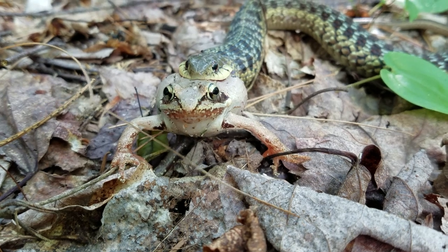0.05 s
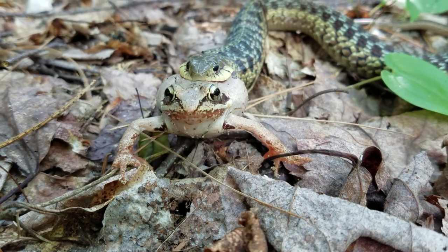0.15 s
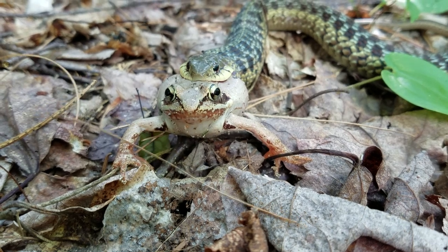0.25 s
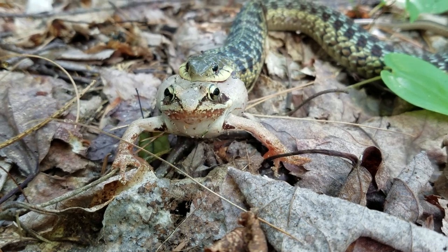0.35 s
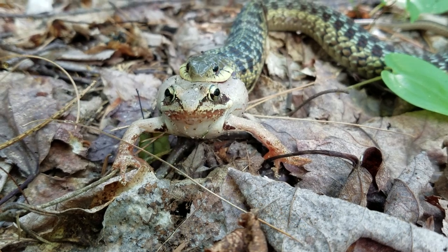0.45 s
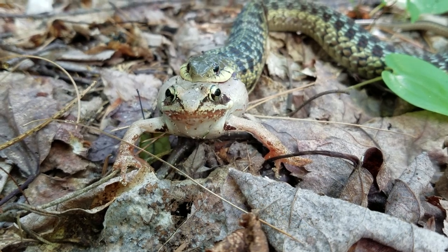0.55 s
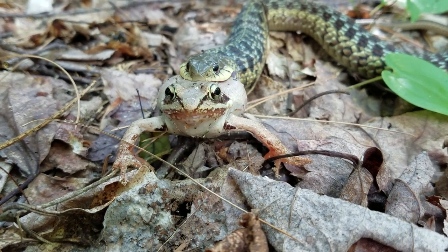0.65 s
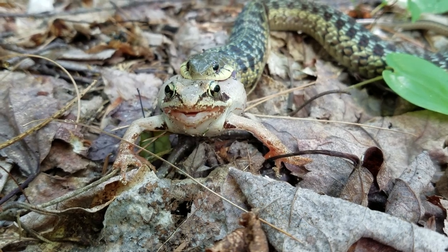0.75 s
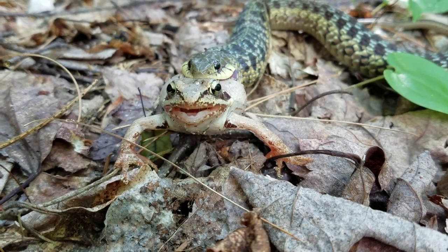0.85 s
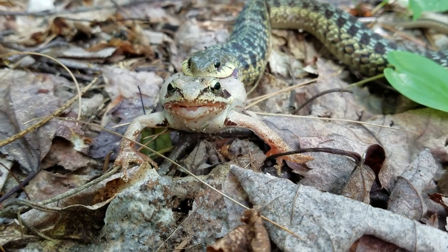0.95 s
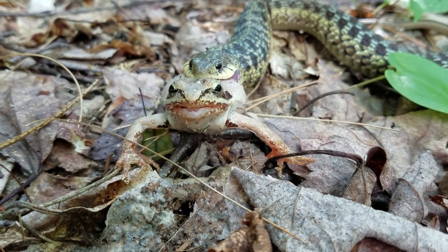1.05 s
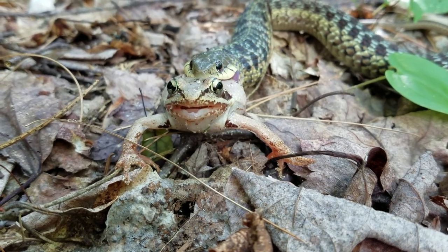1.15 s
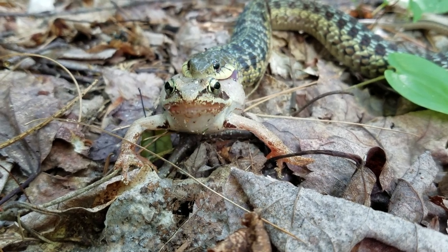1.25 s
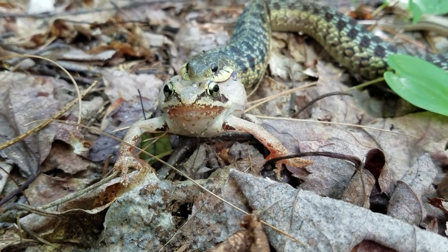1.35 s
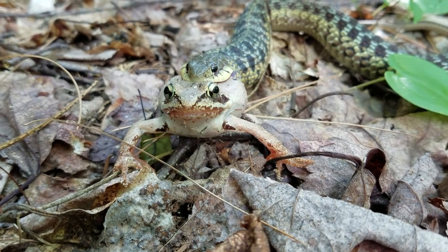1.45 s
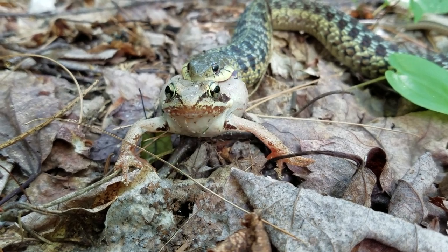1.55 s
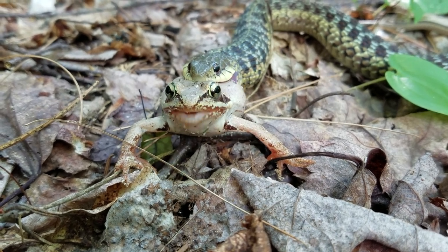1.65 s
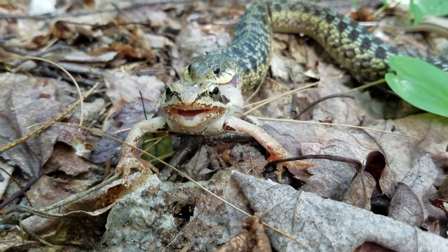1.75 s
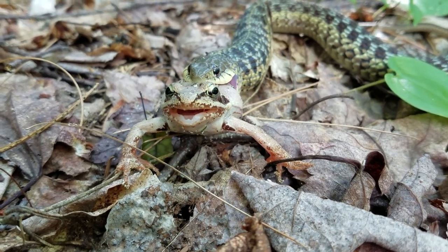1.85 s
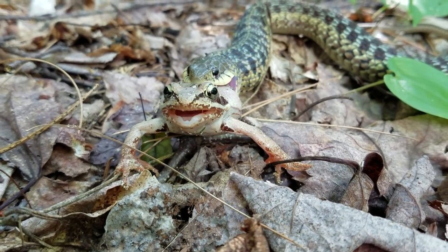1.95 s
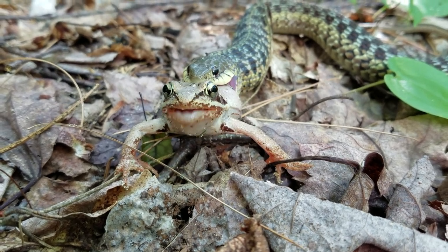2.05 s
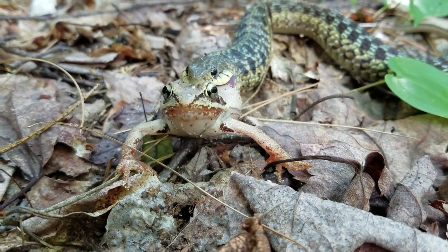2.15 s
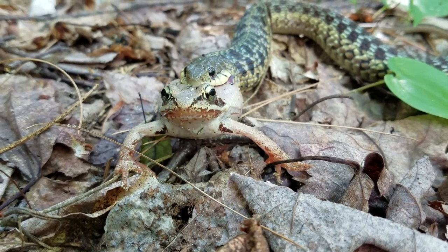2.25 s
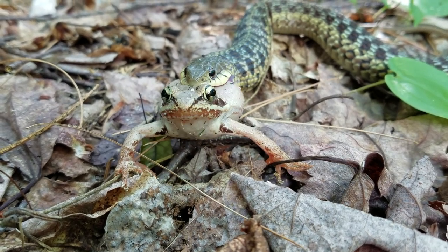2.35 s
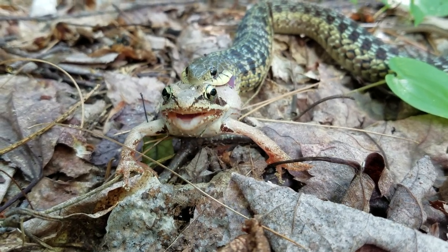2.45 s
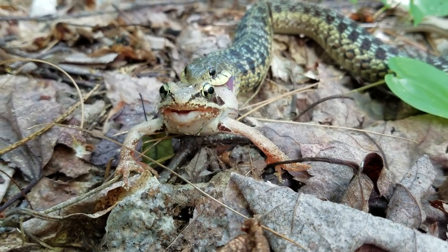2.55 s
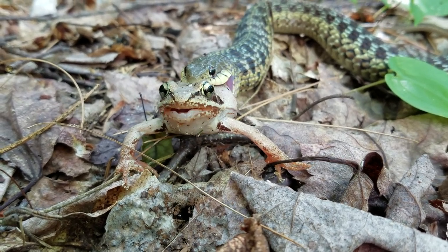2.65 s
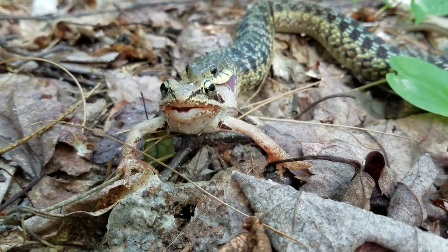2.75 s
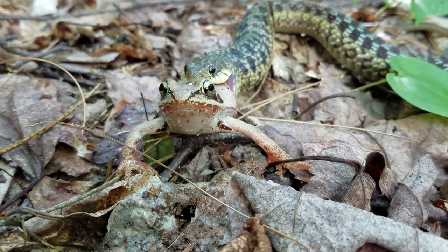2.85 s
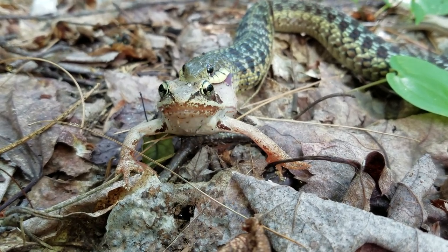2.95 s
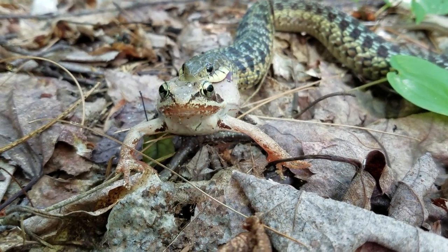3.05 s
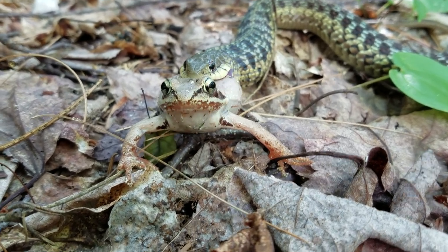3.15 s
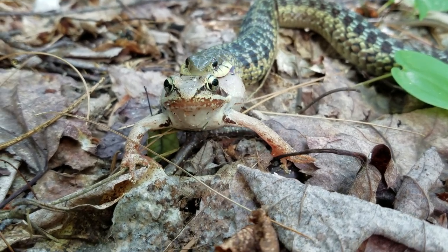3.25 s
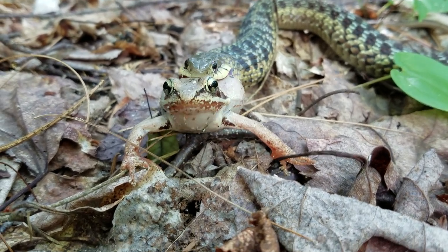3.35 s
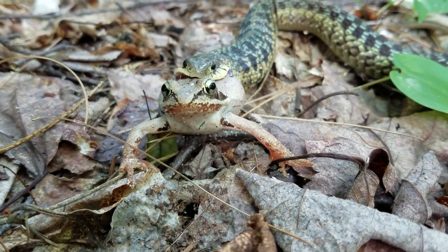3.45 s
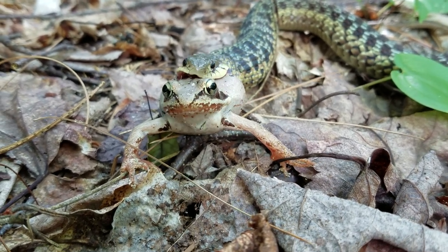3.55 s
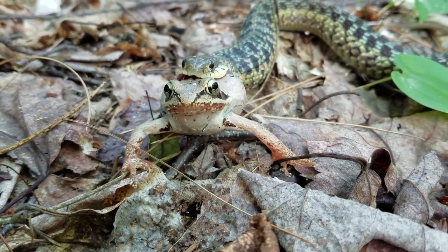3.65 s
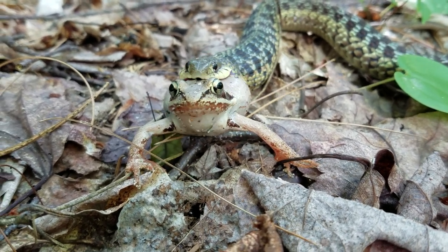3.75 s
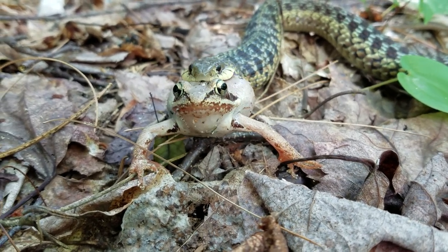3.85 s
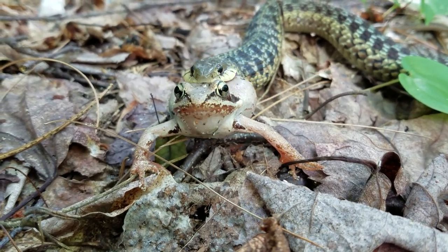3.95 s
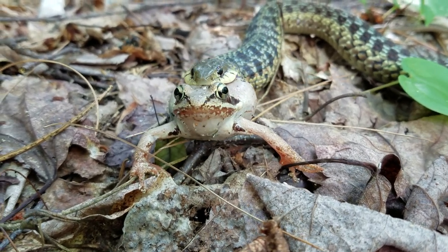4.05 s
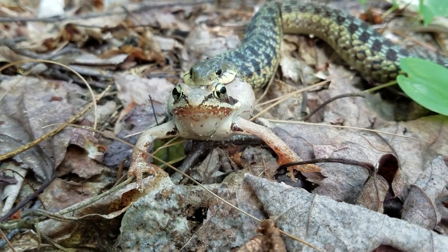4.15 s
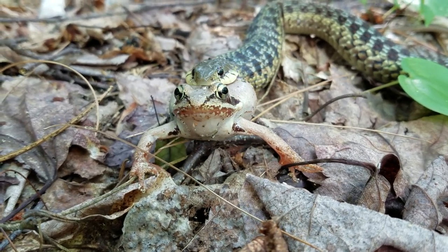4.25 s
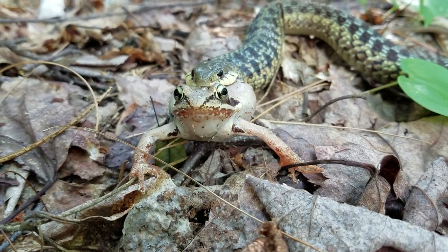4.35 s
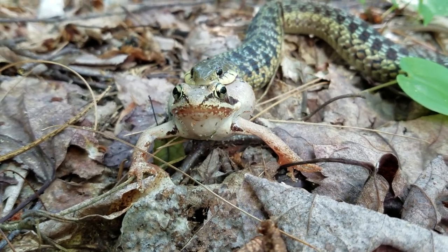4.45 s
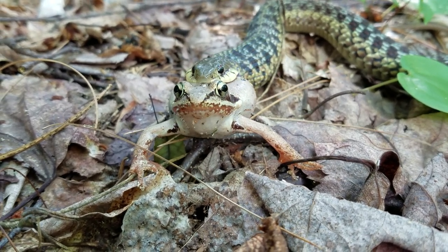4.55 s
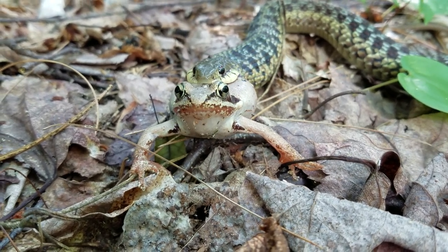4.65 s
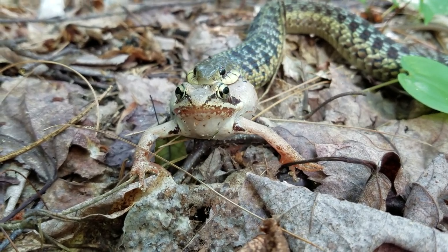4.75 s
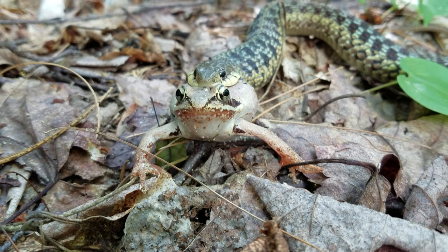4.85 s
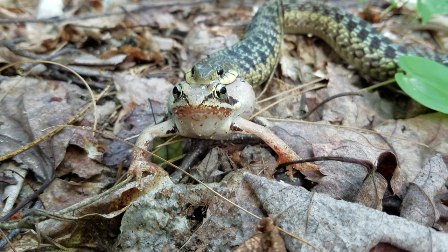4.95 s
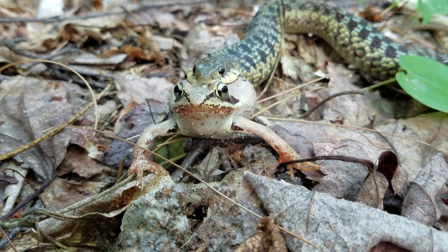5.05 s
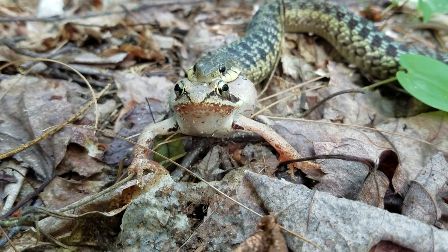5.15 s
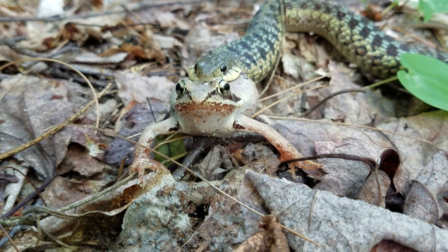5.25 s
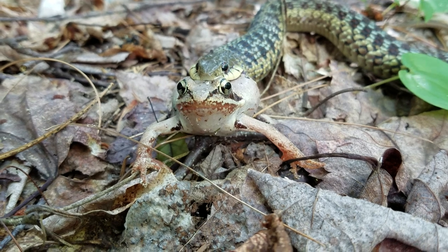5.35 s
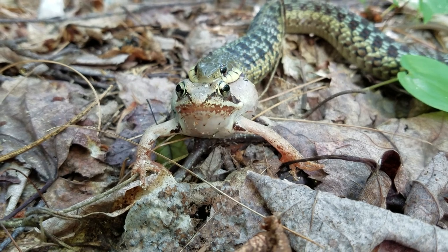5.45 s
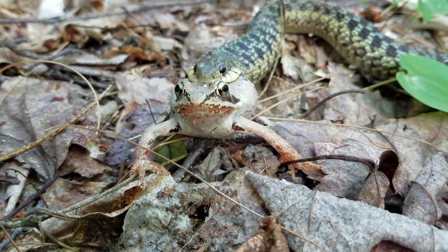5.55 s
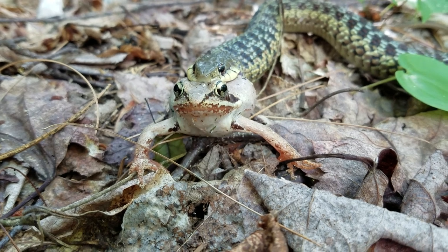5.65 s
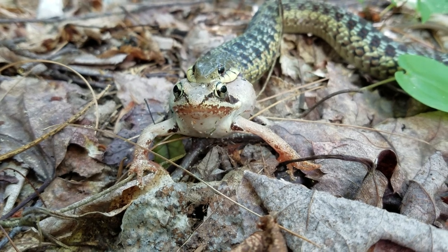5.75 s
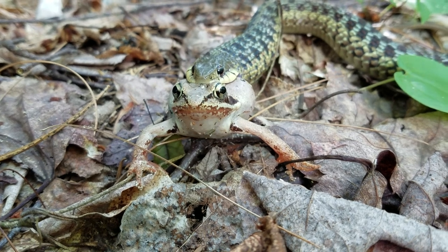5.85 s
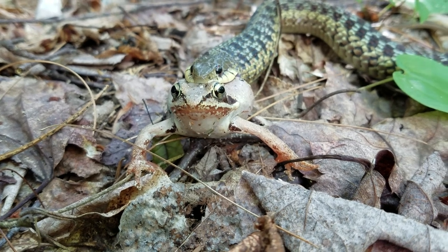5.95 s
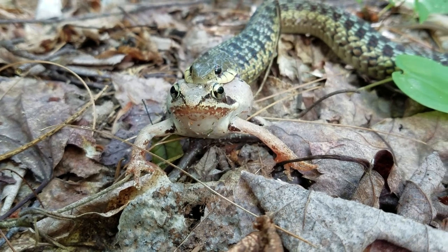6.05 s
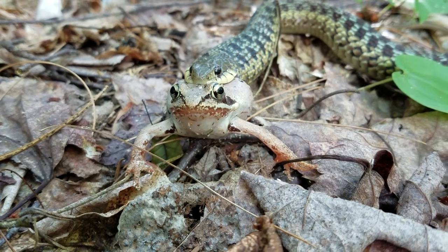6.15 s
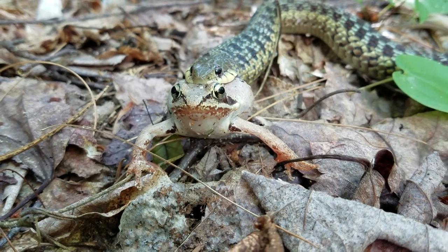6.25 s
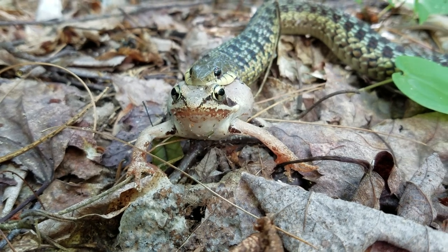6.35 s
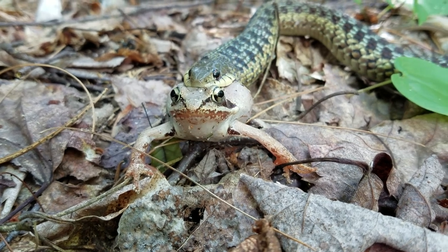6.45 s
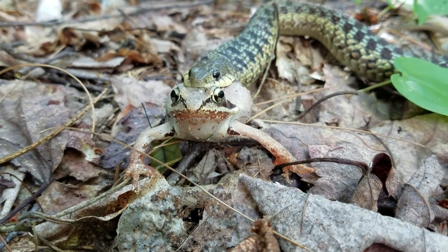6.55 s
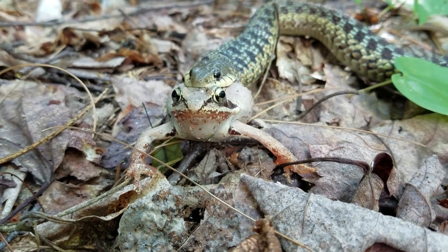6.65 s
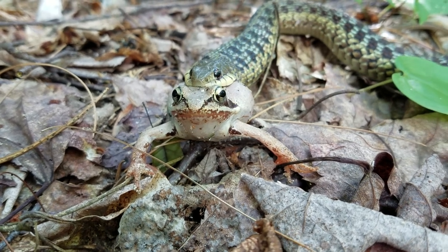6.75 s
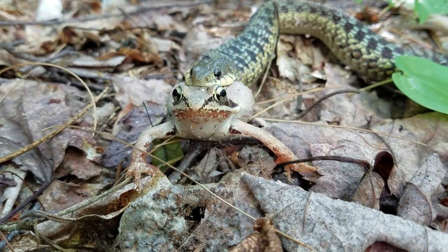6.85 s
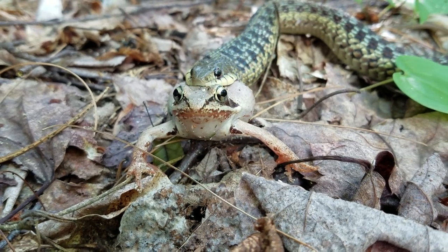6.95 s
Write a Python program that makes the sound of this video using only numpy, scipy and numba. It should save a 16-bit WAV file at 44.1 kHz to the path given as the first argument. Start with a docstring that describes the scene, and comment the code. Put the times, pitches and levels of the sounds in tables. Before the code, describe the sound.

Quiet forest air opens with faint dry leaf ticks and a very low, distant motor drone. At about 0.8 s a tiny double snap launches a frog's piercing scream, climbing fast from about 1.3 to 2.4 kHz, holding, then dropping hoarsely by 1.3 s into a few soft creaks. A second, slightly lower scream runs 1.7 to 2.1 s, again ending in creaks. The third, 2.5 to 2.8 s, is shorter, rougher and lower, rising, sagging and climbing again, then breaking into four slowing snaps and fading creaks. A bright leaf crack comes near 3 s; a faint scaly hiss swells around 3.7 s. From there only sparse crisp leaf cracks remain, strongest near 4.5 and 5 s, with barely felt camera bumps. A small bright chip sounds on the left near 6.9 s. Close, dry stereo, brighter on the right, with slight woodland scatter.

```python
"""Frog screaming in a snake's jaws

A forest floor, close to a hand-held camera's two microphones: a held frog screams three times.
Its vocal cords buzz through a moving mouth resonance; sharp snaps and soft creaks stand around the cries.
Dry leaves crack as filtered noise bursts under the snake, and scales hiss as fluttering noise.
The camera is bumped, one bright chip sounds on the left, and a far motor drones in soft forest air."""
import sys
import numpy as np
from scipy import signal
from scipy.fft import rfft, irfft
from scipy.io import wavfile
from numba import njit

SR = 44100
rng = np.random.default_rng(int(sys.argv[2]) if len(sys.argv) > 2 else 0)


def store_pcm(level_fs):
    """Save levels as 16-bit WAV."""
    pcm = np.round(np.clip(level_fs, -1, 1) * 32767).astype(np.int16)
    wavfile.write(sys.argv[1], SR, np.atleast_2d(pcm).T)


N = 308700
TIME = np.arange(N) / SR


def undb(db):
    """Decibels to gain."""
    return 10 ** (np.asarray(db) / 20)


def unit(x):
    """Scale to rms 1."""
    return x / np.sqrt(np.mean(x ** 2))


def curve(table, axis=1):
    """One column of a time table at every sample."""
    rows = np.array(table)
    return np.interp(TIME, rows[:, 0], rows[:, axis])


def on_log(table, hz):
    """Read (frequency [Hz], value) points on a log-frequency axis."""
    points, values = np.transpose(table)
    return np.interp(np.log(hz + 1), np.log(points), values)


def colour(x, table, size=1024):
    """Minimum-phase filter with the gain of (frequency [Hz], gain [dB]) points."""
    gain = undb(on_log(table, np.fft.rfftfreq(size, 1 / SR)))
    # folding the cepstrum forward in time makes the filter causal
    cepstrum = irfft(np.log(gain))
    cepstrum[1:size // 2] *= 2
    cepstrum[size // 2 + 1:] = 0
    response = irfft(np.exp(rfft(cepstrum)))
    return signal.fftconvolve(x, response)[:len(x)]


@njit
def svf(x, hz, width):
    """State-variable band-pass with a moving centre, gain 1 at the peak."""
    y, b, l = np.empty(len(x)), 0., 0.
    for i in range(len(x)):
        g, k = np.tan(np.pi * hz[i] / SR), width / hz[i]
        v = (b + g * (x[i] + 1e-18 - l)) / (1 + g * (g + k))
        b, l, y[i] = 2 * v - b, l + 2 * g * v, k * v
    return y


def resonate(x, hz, width_hz):
    """One resonance, fixed or moving."""
    return svf(x, hz * np.ones(len(x)), float(width_hz))


def walk(rate_hz):
    """Random wander with spread 1, straight lines between random knots."""
    knots = rng.standard_normal(int(N / SR * rate_hz) + 2)
    return unit(np.interp(TIME * rate_hz, np.arange(len(knots)), knots))


def add(track, s, sound, peak_db):
    """Put a short sound into a track at time s, scaled to a peak level."""
    start = int(s * SR)
    scaled = sound * undb(peak_db) / np.abs(sound).max()
    track[start:start + len(sound)] += scaled[:N - start]


def impulse(size=1024):
    """A single sharp push."""
    return signal.unit_impulse(size)


def frog():
    """The held frog: three screams, snaps of slack cords and creaks, all from one throat."""
    # pitch of each cry: (time [s], pitch [Hz])
    # the first two rise, hold and fall; the third rises, sags and climbs again
    pitch_1, pitch_2, pitch_3 = [(0.855, 1316), (0.865, 1405), (0.881, 1690), (0.907, 1907), (0.915, 1943),
                                 (0.925, 2123), (0.945, 2174), (1.049, 2280), (1.055, 2326), (1.113, 2399),
                                 (1.145, 2358), (1.157, 2391), (1.207, 2210), (1.223, 2072), (1.269, 1460),
                                 (1.292, 1369)], [(1.732, 1282), (1.754, 1509), (1.762, 1690),
                                                  (1.772, 1793), (1.784, 1806), (1.808, 2042),
                                                  (1.842, 1992), (1.884, 2013), (1.902, 2071),
                                                  (1.992, 2070), (2.03, 1986), (2.062, 1736), (2.09, 1441),
                                                  (2.111, 1430)], [(2.529, 1320), (2.545, 1490),
                                                                   (2.563, 1559), (2.605, 1570),
                                                                   (2.637, 1528), (2.657, 1477),
                                                                   (2.677, 1382), (2.701, 1316),
                                                                   (2.715, 1312), (2.747, 1476),
                                                                   (2.765, 1536)]
    # mouth during each cry: (time [s], relative effort [dB], mouth resonance [Hz])
    mouth_1, mouth_2, mouth_3 = [(.857, -.5, 4970), (0.904, -9, 5880), (.94, -8, 5140), (1.101, -8.5, 5000),
                                 (1.209, -5.5, 4890), (1.272, -6, 4520), (1.291, -4.5, 3887)], [(1.732, 2, 5510), (1.779, -1.5, 6300), (1.83, -2.5, 5770),
                                                  (2.029, -2.5, 5805), (2.06, -3, 5820), (2.11, -2, 4490)], [(2.53, 4.5, 6000), (2.58, 3, 5650),
                                                                   (2.606, -.5, 5000), (2.685, -8, 4350),
                                                                   (2.724, -1.5, 4310), (2.748, 4, 4700),
                                                                   (2.764, 4.5, 4420)]
    # fixed colour of the throat: (frequency [Hz], gain [dB])
    throat = [(300, -22), (1300, -2.5), (1550, -.5), (2000, -4), (2400, -3.5), (3000, -7.5), (4000, -11),
              (5000, -8), (6500, -11), (7600, -8), (9000, -13), (10500, -5), (12400, 6), (14300, 5),
              (15700, 10)]
    cries = cry(pitch_1, mouth_1) + cry(pitch_2, mouth_2) + cry(pitch_3, mouth_3)
    voice = colour(cries, throat)
    snaps(voice, throat)
    creaks(voice)
    return voice


def cry(pitch, mouth):
    """Sharp, slightly uneven cord pulses ring the mouth; air rasps at the lips once a cycle."""
    # colour of the rasp in the voice: (frequency [Hz], gain [dB])
    rasp_colour = [(1000, -19), (3000, -9), (5000, 8.5), (7000, 0.5), (9500, -0.5), (15000, -5)]
    rasp_db, voice_db, mouth_width_hz = -28, -0.26, 400
    start_s, end_s = pitch[0][0], pitch[-1][0]
    attack_s, release_s = .001, .0013
    hz = curve(pitch)
    age = np.maximum(TIME - start_s, 0)
    rough = hoarseness(hz, age)
    # the higher a cry's top pitch, the more sharply the cords close: 9 dB of treble an octave
    treble_db = 9 * np.log2(hz.max() / 1400)

    # the pitch wobbles most as the cry starts, then steadies
    hz = hz * (1 + .0075 * np.exp(-age / .33) * walk(90))
    # quick and slower unevenness of the cords, as shares of the pitch
    jitter = .0045 * rough * walk(1300)
    waver = .0024 * (rough + 0.13) * walk(120)
    phase = 2 * np.pi * np.cumsum(hz * (1 + jitter + waver)) / SR
    # equal harmonics make sharp pulses; those too near half the sample rate are left out
    buzz = sum(np.cos(k * phase) * (k * hz < SR * .45) for k in range(1, 14))
    rasp = rough * undb(rasp_db) * (1 + np.cos(phase)) * colour(rng.standard_normal(N), rasp_colour)

    # the cords catch within a millisecond and stop almost as fast
    attack = np.clip((TIME - start_s) / attack_s + 1, 0, 1)
    release = np.clip(1 - (TIME - end_s) / release_s, 0, 1)
    shimmer = 1 + 0.2 * rough * walk(500)
    effort = attack * release * undb(curve(mouth) + voice_db) * shimmer
    voice = resonate(buzz * effort, curve(mouth, axis=2), mouth_width_hz) + rasp * effort
    return colour(voice, [(8000, 0), (14000, treble_db)])


def hoarseness(hz, age):
    """Roughness 0-1: cords rasp as they catch, and more the further the pitch is below the cry's top."""
    catch_rough, catch_s = .42, .045
    held, slack_gain, slack_power = .015, 1.8, 1.1
    slack = 1 - hz / hz.max()
    catch = catch_rough * np.exp(-(age / catch_s) ** 2)
    return np.clip(held + slack_gain * slack ** slack_power + catch, 0, 1)


def snaps(voice, throat):
    """Slack cords snap ever more slowly, each snap ringing a lower mouth resonance."""
    # runs of snaps: (start [s], count, first gap [s], peak [dB], first mouth resonance [Hz])
    snap_runs = [(0.8077, 2, 0.0017, -8, 4480), (2.7888, 4, .0138, -4, 4660)]
    gap_ratio, fall_hz, width_hz = 1.145, 168, 430
    for s, count, gap, db, hz in snap_runs:
        for k in range(round(count)):
            snap = resonate(impulse(), hz - fall_hz * k, width_hz)
            add(voice, s, colour(snap, throat), db)
            s += gap * gap_ratio ** k


def creaks(voice):
    """Soft pushes ring a closing mouth; the pulses crowd together, sink in pitch and fade."""
    # creaks: (start [s], count of pulses, first gap [s], first peak [dB])
    creak_runs = [(0.743, 1, 0.018, -34), (1.3422, 5, .0145, -28.5), (2.149, 5, 0.01605, -24),
                  (2.887, 9, 0.018, -24.5)]
    # other resonances of the nearly closed mouth: (centre [Hz], width of first pass [Hz], gain [dB])
    cavity_modes = [(654, 133, -13.5), (7600, 2200, -20.5), (14700, 3200, -18.5)]
    open_hz, closed_hz, width_hz = 2100, 1550, 1000
    last_gap_s, gap_shrink, fade_db = .0048, .52, 9.5  # the excess gap shrinks by this ratio a pulse
    cavity = 0
    for hz, width, db in cavity_modes:
        cavity = cavity + undb(db) * resonate(resonate(impulse(), hz, width), hz, 2 * width)
    for s, count, gap, db in creak_runs:
        for k, closing in enumerate(np.linspace(0, 1, round(count))):
            hz = open_hz + (closed_hz - open_hz) * closing
            # a soft push holds little above the resonance that it rings
            low_pass = signal.butter(6, 1.25 * hz, fs=SR, output="sos")
            push = signal.sosfilt(low_pass, impulse())
            add(voice, s, resonate(push, hz, width_hz) + cavity, db - fade_db * closing ** 2)
            s += last_gap_s + (gap - last_gap_s) * gap_shrink ** k


def leaves():
    """Pressed leaves crack and crumble: each tick is a bright noise burst over a duller leaf body."""
    # loudest cracks: (time [s], peak [dB], leaf body relative to crack [dB])
    loud_ticks = [(.12, -35, -13), (.348, -32, -31), (.702, -31.5, -22.5), (.7435, -30, -9),
                  (.8454, -24, -22), (2.348, -33.5, -11), (2.477, -36, -11), (2.522, -30, -36),
                  (2.8865, -23.5, -18), (2.9618, -17, -21), (3.036, -37, -15), (3.194, -27.5, -17),
                  (3.861, -33.5, -15.5), (4.548, -20.5, -11.5), (4.751, -40, -3), (5.039, -26, -17.5),
                  (5.24, -31, -20), (5.431, -33.5, -17), (5.596, -34.5, -12.5), (6.506, -32, -17)]
    # spells of faint ticking in the litter: (start [s], end [s], count of ticks, weakest peak [dB])
    stirs = [(0, 6.9, 60, -53), (.25, 0.64, 12, -45.5), (4.7, 6.05, 11, -45)]
    # colours of a leaf's crack and of its body: (frequency [Hz], gain [dB])
    crack_colour, body_colour = [(2000, -25.5), (4000, -15), (7500, -8), (9000, -11.5), (11500, -4),
                                 (14000, 2), (16000, -3)], [(150, -9), (800, 0), (1400, 0.5), (2600, -7), (3900, -4.5),
                                               (5000, -26), (10000, -36.5)]
    crack_s, crumble_s, body_s, crumble_db = .00098, .005, .003, -24
    faint_spread_db, faint_body_db = 10, -17
    faint_ticks = []
    for start, end, count, db in stirs:
        for place, size in rng.random((round(count), 2)):
            s = start + (end - start) * place
            faint_ticks.append((s, db + faint_spread_db * size ** 2, faint_body_db))

    track, t = np.zeros(N), TIME[:2048]
    crack_decay = np.exp(-t / crack_s) + undb(crumble_db) * np.exp(-t / crumble_s)
    for s, db, body_db in list(loud_ticks) + faint_ticks:
        grain = np.tanh(2 * rng.standard_normal((2, len(t))))
        crack = colour(grain[0] * crack_decay, crack_colour)
        body = colour(grain[1] * np.exp(-t / body_s), body_colour)
        add(track, s, unit(crack) + undb(body_db) * unit(body), db)
    return track


def slide():
    """Scales slide once across the leaves: a fluttering hiss swells, fades and stops."""
    # colour of scales on leaves: (frequency [Hz], gain [dB])
    scales = [(300, -3), (1000, -9), (2200, -7), (4500, -11.5), (9000, -17), (11000, -2.5), (13500, 0.5),
              (16000, -5)]
    peak_s, stop_s, peak_db, slope_db_per_s = 3.73, 3.875, -53, 54
    flutter = undb(2.9 * walk(210))
    hiss = unit(colour(rng.standard_normal(N) * flutter, scales))
    level_db = peak_db - slope_db_per_s * np.abs(TIME - peak_s)
    return hiss * undb(level_db) * (TIME < stop_s)


def bumps():
    """Fingers nudge the camera body: one low, heavily damped swing a bump, alike in both channels."""
    # soft bumps: (time [s], peak [dB], swing frequency [Hz])
    nudges = [(1.251, -48, 130), (4.707, -44, 170), (4.848, -52, 280), (6.831, -49, 130), (6.907, -48, 141)]
    track, width_hz = np.zeros(N), 190
    for s, db, hz in nudges:
        swing = resonate(impulse(size=2048), hz, width_hz)
        add(track, s, resonate(swing, hz, 2 * width_hz), db)
    return track


def chip():
    """One short, bright chip from the left: a sine under a bell-shaped envelope."""
    hz, middle_s = 2550, .0009
    track, t = np.zeros(N), TIME[:1024]
    bell = np.exp(-2 * (t / middle_s - 1) ** 2)
    add(track, 6.8668, np.sin(2 * np.pi * hz * t) * bell, -32)
    return track * np.array([[1], [.65]])  # left, right


def surroundings(near):
    """Litter scatters the sound briefly, trunks more faintly and longer; each microphone has its own mix."""
    # reflectors: (width of the band about 3500 Hz [Hz], level [dB], time to fall 60 dB [s])
    litter, trunks = (10000, -29, 0.079), (5000, -43, 0.47)
    t = TIME[:SR // 2]
    out = 0
    for width_hz, db, t60 in (litter, trunks):
        source = resonate(near, 3500, width_hz)
        tail = rng.standard_normal((2, len(t))) * undb(-60 * t / t60) * (t > .001)
        tail = tail / np.sqrt(np.sum(tail ** 2, axis=1, keepdims=True))
        out = out + undb(db) * np.array([signal.fftconvolve(source, side)[:N] for side in tail])
    return out


def motor():
    """A far motor's wavering drone: noise through two narrow resonances at one low pitch."""
    # drone: (time [s], level [dB])
    drone_level = [(.3, -82), (.55, -68), (1.7, -70.5), (2.3, -75.5), (3.3, -76.5), (3.8, -67.5),
                   (4.3, -74.5), (7, -76)]
    hz, width_hz = 133, 19
    drone = resonate(resonate(rng.standard_normal(N), hz, width_hz), hz, width_hz)
    return unit(drone) * undb(curve(drone_level))


def forest_air():
    """Soft coloured noise, most alike at the two microphones in the bass."""
    # spectrum of the air: (frequency [Hz], relative density [dB per Hz])
    air_colour = [(15, -46), (25, -18), (32, -18.5), (102, -5.5), (134, -9), (157, -6.5), (200, -5.5),
                  (285, -8), (887, -14), (1520, -18), (2760, -16.5), (4870, -23), (7710, -26.5),
                  (8830, -32.5), (16000, -23)]
    # likeness of the two channels: (frequency [Hz], correlation [-1..1])
    air_likeness = [(130, 0.66), (290, .67), (640, .29), (1410, -.24), (3100, .03)]
    # balance of the two channels: (frequency [Hz], left minus right [dB])
    air_balance = [(2400, 0.47), (4400, -2.5), (8100, -12.5), (15000, -5)]
    level_db = -63.5  # of the two channels' mean
    hz = np.fft.rfftfreq(N, 1 / SR)
    likeness = np.clip(on_log(air_likeness, hz), -.9, .9)
    mid, side = rfft(rng.standard_normal((2, N)))
    signs = np.array([[1], [-1]])  # left, right
    bins = mid + signs * side * np.sqrt((1 - likeness) / (1 + likeness))
    gain_db = on_log(air_colour, hz) + signs * on_log(air_balance, hz) / 2
    air = irfft(bins * undb(gain_db), N)
    # the air swells a little over the first 0.6 s, then holds
    swell_db = np.interp(TIME, [0, .6], [-3.5, 0])
    return air / air.mean(axis=0).std() * undb(level_db + swell_db)


def scene():
    """Frog and leaves face the right microphone; the left hears them shaded and slightly later."""
    # shading of the left microphone from the ground ahead: (frequency [Hz], left minus right [dB])
    shade = [(1550, 0), (2250, -6.5), (2950, -1), (3400, -11), (4400, -9.5), (4800, -26), (5800, -18),
             (6700, -26), (8000, -21.5), (9500, -17.5), (11500, -16), (12400, -36), (14500, -28.5),
             (15700, -29.5)]
    near = frog() + leaves() + slide()
    lag = 6  # samples
    left = np.pad(colour(near, shade), (lag, 0))[:N]
    direct = np.array([left, near])
    return direct + surroundings(near) + bumps() + chip() + motor() + forest_air()


def record(dry):
    """The camera cuts the top with a steep low-pass."""
    top_hz = 15950
    return signal.sosfilt(signal.ellip(10, .2, 80, top_hz, fs=SR, output="sos"), dry)


dry = scene()
out = record(dry)
store_pcm(out)
```